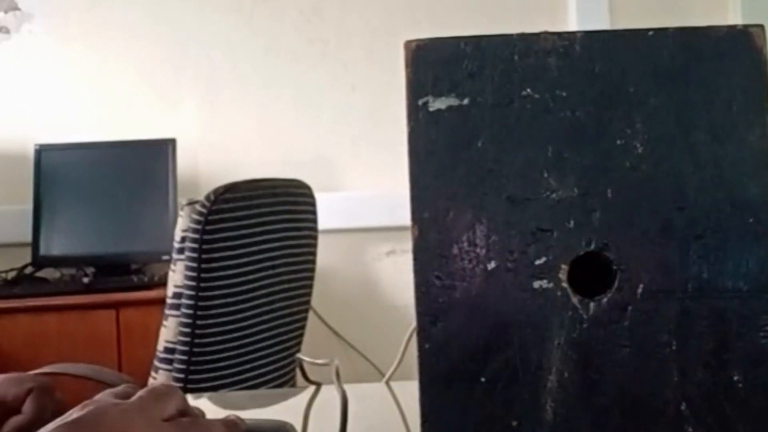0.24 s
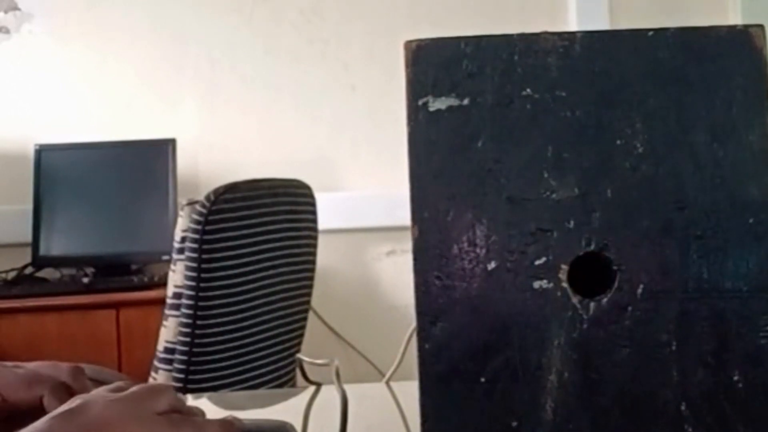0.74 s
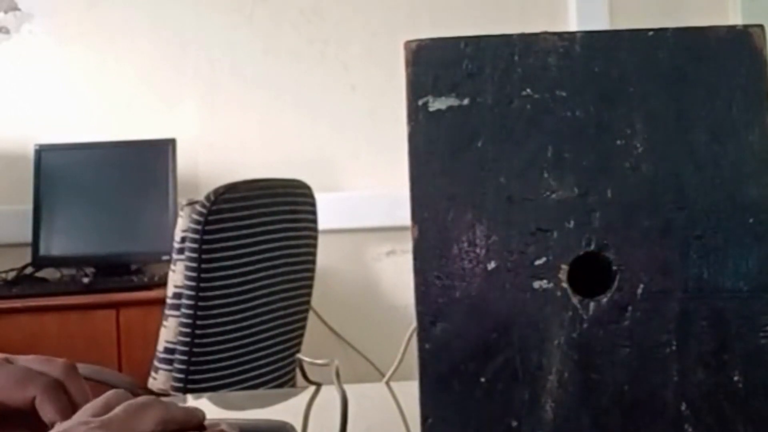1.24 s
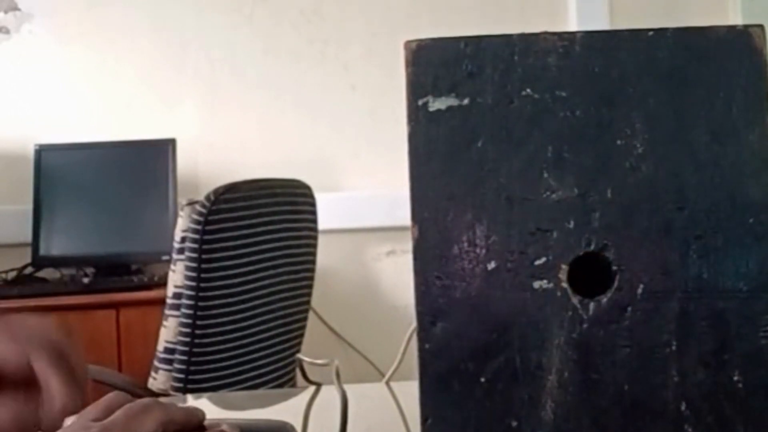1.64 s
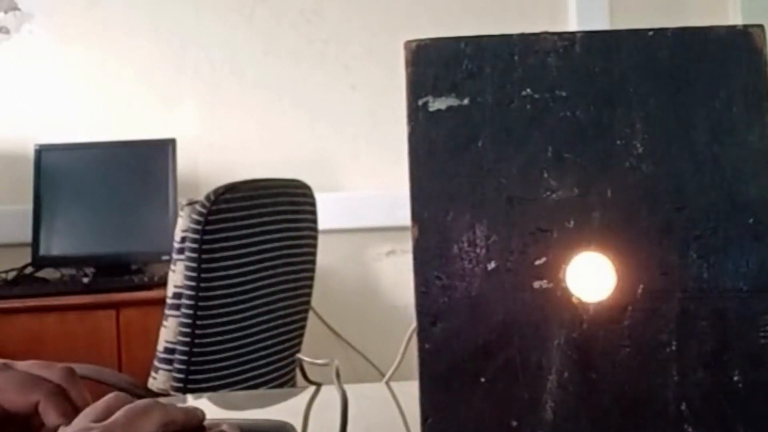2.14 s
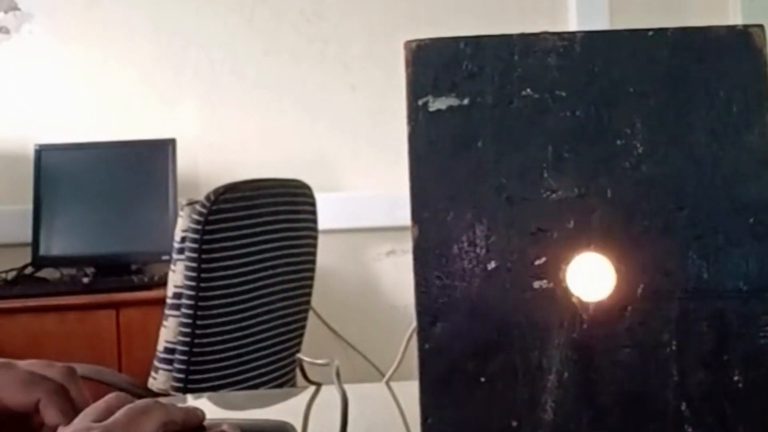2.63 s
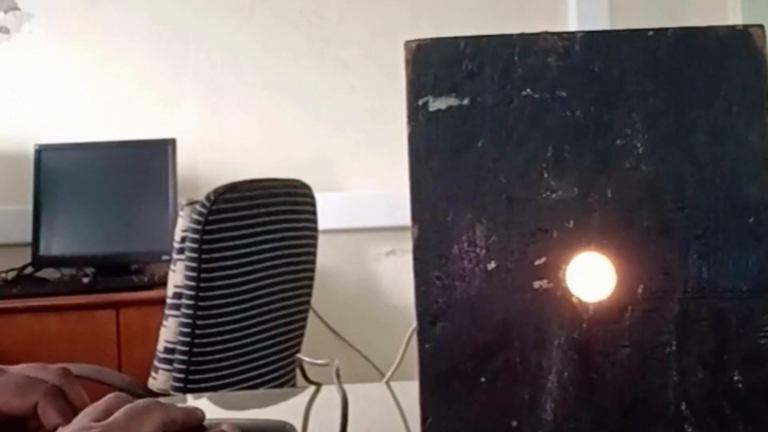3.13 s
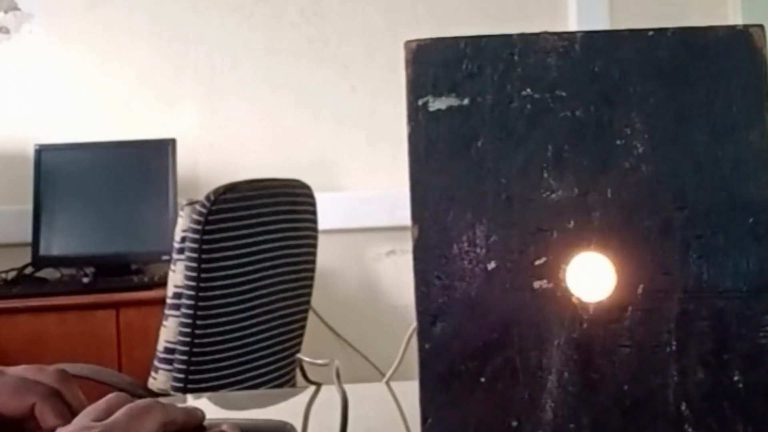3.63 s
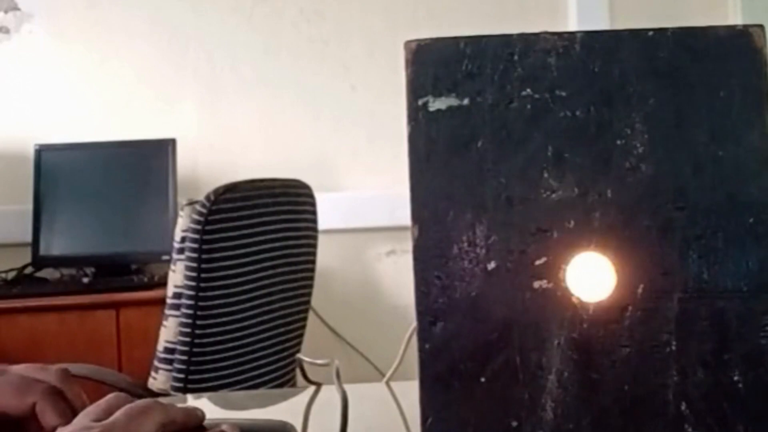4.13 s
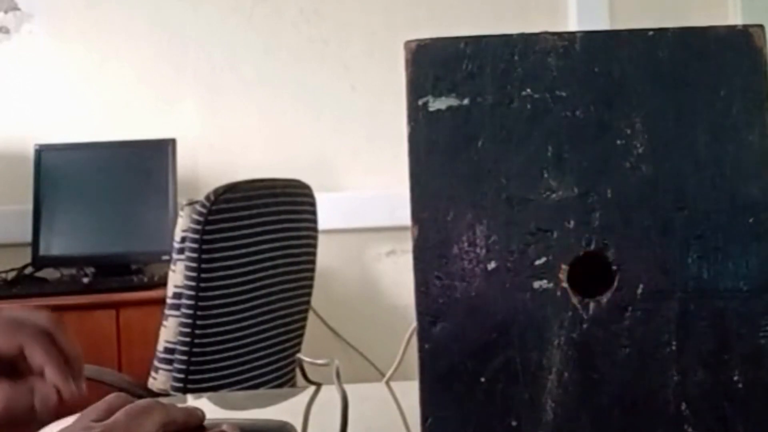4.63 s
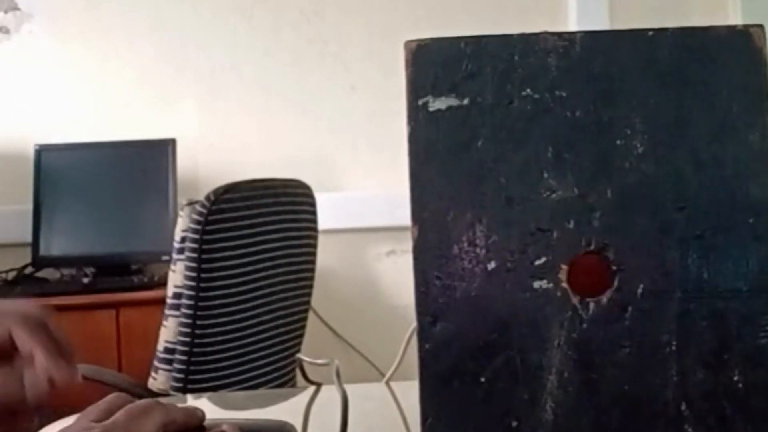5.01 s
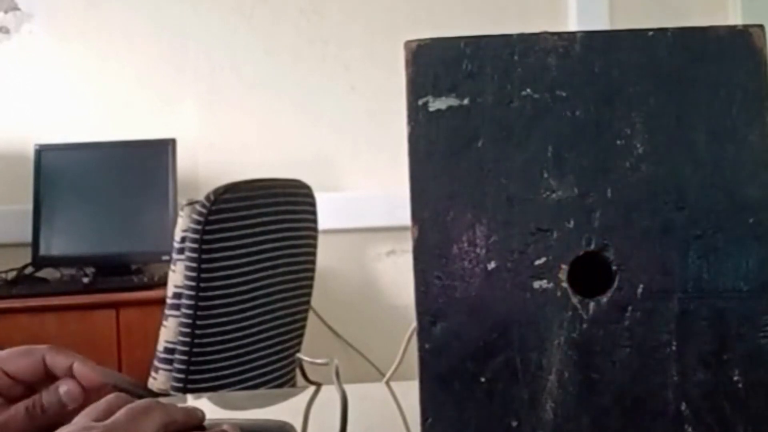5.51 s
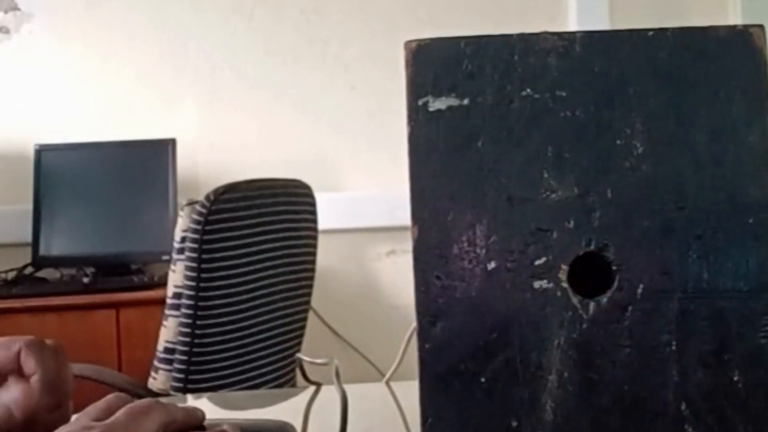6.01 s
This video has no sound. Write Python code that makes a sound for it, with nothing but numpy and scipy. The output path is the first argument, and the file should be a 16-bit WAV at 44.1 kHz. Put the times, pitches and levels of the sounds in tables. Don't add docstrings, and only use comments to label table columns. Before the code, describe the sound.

A small hard room, heard by a phone on a desk, with a signalling key close by and slightly left. Faint street noise and a thin hum lie underneath, while a draught makes soft, low, irregular bumps, separate on each side. A soft rub passes at 0.2 s and a brief brush at 1.2. At 1.7 the lever hisses and ticks sharply, its base knocking dully on the wood with a rapid little bounce and a short boxy echo. A heavier clack follows at 2.6, a light, ringing one at 3.5, then two strong ones at 4.45 and 4.9, each trailed by a small dry snap, the second clearer. Faint bird whistles, blurred and falling, come from far outside around 2 and from 5 to 5.7. After the last stroke only draught thumps, strongest near 6.0, and quiet air remain until 6.3.

```python
import sys
import numpy as np
from scipy import signal
from scipy.fft import rfft, irfft, next_fast_len
from scipy.io import wavfile
from scipy.ndimage import uniform_filter1d

SR = 44100
rng = np.random.default_rng(int(sys.argv[2]) if len(sys.argv) > 2 else 0)


def ratio(d):
    e = np.asarray(d, float) / 20
    return 10 ** e


def file_out(sig):
    cols = np.atleast_2d(sig).T
    lim = np.clip(cols, -1, 1)
    pcm = np.round(lim * 32767).astype(np.int16)
    wavfile.write(sys.argv[1], SR, pcm)


N = 276066

# start [s], peak [dB], scrape before it [dB], hiss swelling into it [dB], room [dB].
TICKS = [
    (1.7107, -23, -5, -11.5, 5),
    (2.6253, -20.5, -8, -25, 1),
    (3.484, -23, -9.5, -50, -4.5),
    (4.4547, -18.5, -11, -20.5, -1.5),
    (4.8719, -18, -10, -16, 2),
]
# start [s], peak [dB], desk ring [dB], room [dB].
THUDS = [
    (1.7204, -17, -6.5, -1.5),
    (2.6363, -13.5, -7, -2.5),
    (3.491, -28, 1, -5),
    (4.4658, -14, -7, -0.5),
    (4.8835, -14, -5.5, -3),
]
# start [s], peak [dB].
REBOUNDS = [
    (4.5433, -44),
    (4.947, -32.5),
]
# frequency [Hz], density [dB per Hz].
AIR = [(120, -22), (200, -10), (334, -15), (500, -16), (900, -24), (1900, -24.5), (3000, -33), (4400, -40),
       (5400, -36.5), (7700, -43), (8200, -54), (11000, -51.5), (14000, -46), (15000, -41.5),
       (15900, -50.5)]


def band(x, hz, width):
    return signal.lfilter(*signal.iirpeak(min(hz, .45 * SR), hz / width, fs=SR), x)


def steep(x, hz, width):
    return band(band(x, hz, width), hz, width)


def unit(x):
    return x / np.max(np.abs(x))


def fade(t, t60):
    return np.exp(-np.log(1000) * t / t60)


def smooth(x, size):
    return uniform_filter1d(uniform_filter1d(x, size), size)


def add(out, x, s):
    i = int(s * SR)
    n = min(x.shape[-1], out.shape[-1] - i)
    out[..., i:i + n] += x[..., :n]


def walk(rate):
    hold = int(SR / rate)
    steps = np.repeat(rng.standard_normal(N // hold + 1), hold)
    return 1.3 * smooth(steps, hold)[:N]


def at(table, hz):
    return np.interp(np.log(hz), np.log(np.array(table)[:, 0]), np.array(table)[:, 1])


def blend(mid, side, like):
    return np.sqrt(1 + like) * mid + np.sqrt(1 - like) * side * np.array([1, -1]).reshape(2, *[1] * mid.ndim)


def pair(length, hz, width, like):
    mid, side = steep(rng.standard_normal((2, length)), hz, width)
    return blend(mid, side, np.clip(like, 0, 1))


def air():
    # frequency [Hz], level [dB rms].
    hum_lines = [(269, -87), (333.5, -77), (572, -92)]
    # frequency [Hz], left-right likeness [0-1].
    alike = [(60, .2), (130, 0.3), (290, 1), (640, 0.25), (1400, 0.), (6800, 0.4), (15000, 0.8)]
    # time [s], level [dB].
    street = [(0, -68.5), (0.328, -73), (0.899, -68), (1.44, -72.5), (1.692, -65), (2.039, -72),
              (2.498, -70.5), (3.679, -73), (4.2, -68.5), (4.831, -73), (5.199, -73), (6.26, -69)]
    treble_swell = 0.45

    t = np.arange(N) / SR
    hz, when, (mid, side) = signal.stft(rng.standard_normal((2, N)), SR, nperseg=1024)
    hz = np.maximum(hz, 20)[:, None]
    s, db = np.transpose(street)
    treble = np.clip(np.log2(hz / 600) / 3, 0, 1)
    swell_db = np.interp(when, s, db - db.mean()) * (1 - (1 - treble_swell) * treble)
    patch = rng.standard_normal(mid.shape)
    patch = uniform_filter1d(uniform_filter1d(patch, size=4, axis=0), size=5, axis=1)
    both = blend(mid, side, np.clip(at(alike, hz), 0, 1))
    level_db = at(AIR, hz) + swell_db + 3.0 * patch / patch.std()
    out = signal.istft(both * ratio(level_db), SR, nperseg=1024)[1][:, :N]
    hum = np.zeros(N)
    for hum_hz, db in hum_lines:
        hum += ratio(db + 2.0 + walk(18)) * np.sin(2 * np.pi * hum_hz * t + 0.86 * walk(18))
    return out / out.std() * ratio(-69.5 + np.array([[1.1], [-1.1]])) + hum


def small_eddies(gusts):
    gap_s, eddy_hz, cycles, scatter_db = 0.031, 92, 1.7, 3
    chance = rng.standard_normal((400, 3))
    s = gap_s * (np.arange(len(chance)) + .25 * chance[:, 0]) + .04
    strength = sum(ratio(db) * np.exp(-.5 * ((s - middle) / (length / 2)) ** 4) for middle, length, db in gusts)
    db = 20 * np.log10(strength + 1e-6) + scatter_db * chance[:, 1]
    rows = np.transpose([s, db, eddy_hz * (1 + 0.22 * chance[:, 2]), np.full(len(s), cycles)])
    return list(rows[s < N / SR])


def draught(puffs, gusts, rumble_db):
    out, t = np.zeros(N), np.arange(-1600, 1600) / SR
    strong_cycles = 1.094
    eddies = [(s, db, hz, strong_cycles) for s, db, hz in puffs] + small_eddies(gusts)
    for (s, db, hz, cycles), turn in zip(eddies, rng.random(500)):
        puff = np.exp(-.5 * (2.54 * t * hz / cycles) ** 2) * np.cos(2 * np.pi * (hz * t + turn))
        add(out, ratio(db) * puff, max(s + t[0], 0))
    gust = np.sqrt(np.abs(smooth(out ** 2, 2500)))
    rumble = steep(rng.standard_normal(N), 60, 120)
    rumble_level = (ratio(rumble_db) + ratio(-10.5) * gust) * ratio(5.3 * walk(25))
    out = out + rumble_level * rumble / rumble.std()
    return signal.sosfiltfilt(signal.butter(3, [44., 300.], "band", fs=SR, output="sos"), out)


def rustles():
    # start [s], peak [dB], rise [s], t60 [s].
    rubs = [
        (.161, -52, 0.018, 0.41),
        (1.203, -52.5, 0.0004, .2),
        (3.238, -66, 0.024, 0.27),
        (5.564, -73.5, 0.028, .15),
        (5.899, -84, 0.02, 0.29),
        (4.427, -55, 0.0082, .12),
    ]
    # frequency [Hz], width [Hz], level [dB].
    rubbed = [
        [(2510, 530, -0.5), (4820, 1670, -8.5), (13900, 2000, -24), (960, 1600, -7.5)],
        [(6580, 1320, 3.5), (14040, 3600, -7), (2200, 660, -13.5)],
        [(5380, 1400, -1), (7160, 560, -2), (1850, 350, -1.5), (11700, 2600, -8.5)],
        [(14460, 1870, 5)],
        [(12850, 3600, 0.5)],
        [(6510, 1500, 1.5), (2050, 400, -1.5), (10940, 3700, -1)],
    ]

    out, t = np.zeros((2, N)), np.arange(int(.25 * SR)) / SR
    for (s, db, rise, t60), colours in zip(rubs, rubbed):
        grain = ratio(2.5 * np.repeat(rng.standard_normal(len(t) // 150 + 1), 150)[:len(t)])
        shape = np.minimum(t / rise, 1) * fade(np.maximum(t - rise, 0), t60)
        shape = shape / (1 + np.exp((t - .085) / 0.019))
        for hz, width, g_db in colours:
            noise = grain * rng.standard_normal((2, len(t)))
            noise = steep(steep(noise, hz, 2.7 * width), hz, 2.7 * width)
            add(out, ratio(db + g_db) * shape * noise / noise.std(), s)
    return out


def ticks():
    # frequency [Hz], width [Hz], level [dB].
    contact = [(1430, 1800, -12.5), (2130, 810, -6), (4900, 4400, -2.5), (7270, 1100, -5.5),
               (9500, 1800, -11), (12120, 1100, -1), (14600, 1800, -15.5)]
    lead_s = .019

    out, t = np.zeros(N), np.arange(2600) / SR - lead_s
    for s, db, scrape_db, hiss_db, _ in TICKS:
        noise = rng.standard_normal((3, len(t)))
        chatter = noise[0] * (t > 0) * (np.exp(-(t / 0.0011) ** 4) + 0.13 * np.exp(-t / 0.0021))
        tick = sum(ratio(g_db) * unit(steep(chatter, hz, width)) for hz, width, g_db in contact)

        rub = np.where(t < 0, np.clip(1 + t / 0.0076, 0, 1), np.exp(-t / 0.0047)) * noise[1]
        scrape = band(rub, 1900, 470) + ratio(-17.5) * steep(rub, 5200, 8400)

        approach = np.exp(t / 0.034) * np.minimum((t + lead_s) / 0.0055, 1)
        hiss = np.where(t < 0, approach, np.exp(-t / 0.0044)) * steep(noise[2], 6000, 22000)

        stroke = unit(tick) + ratio(scrape_db) * unit(scrape) + ratio(hiss_db) * unit(hiss)
        add(out, ratio(db) * stroke, s - lead_s + 0.00041)
    return out


def arm():
    # frequency [Hz], level [dB], t60 [s].
    arm_lines = [(7400, 0.5, 0.26), (9250, -8, .25), (10700, -6, 0.2), (12000, -4.5, .28), (14200, -9, .2)]
    arm_db = [-30, -29.5, -24.5, -27.5, -34]
    smear_hz = 1300

    out, t = np.zeros((2, N)), np.arange(int(.2 * SR)) / SR
    for (s, db, *_), ring_db in zip(TICKS, arm_db):
        for hz, g_db, t60 in arm_lines:
            line = pair(len(t), hz, smear_hz, 0.79)
            add(out, ratio(db + ring_db + g_db) * line / line.std() * fade(t, t60), s)
    return out


def room():
    # frequency [Hz], level [dB], t60 [s].
    answer = [(187, -5, 0.13), (301, -3.5, 0.3), (480, 4, 0.24), (730, 3.5, 0.21), (1204, -2, 0.23),
              (1610, -19.5, 0.12), (2039, -1.5, 0.23), (3440, -11.5, 0.22), (4860, -14, 0.27),
              (6570, -12.5, 0.3), (9500, -32, 0.1), (12200, -22, 0.34), (15000, -28, .3)]
    # frequency [Hz], left-right likeness [0-1].
    room_alike = [(150, 0.9), (290, 0.99), (640, 0.09), (1400, 0), (4000, 0.05), (8000, 0.4), (15000, 0.6)]

    out, t = np.zeros((2, N)), np.arange(int(.3 * SR)) / SR
    blows = [(s, db + room_db + 8.0, True) for s, db, *_, room_db in TICKS]
    blows += [(s, db + 11.0, True) for s, db in REBOUNDS]
    blows += [(s, db + room_db, False) for s, db, _, room_db in THUDS]
    for s, blow_db, sharp in blows:
        echo = np.zeros((2, len(t)))
        for hz, db, t60 in answer:
            width = hz * np.interp(hz, [300, 500, 4000, 9000], [0.3, 0.42, 0.37, 0.23])
            wash = pair(len(t), hz, width, at(room_alike, hz))
            echo += ratio(db) * wash * np.sqrt(1070000.0 / hz) * fade(t, t60)
        if sharp:
            echo = signal.lfilter(*signal.butter(1, 3000., "high", fs=SR), echo)
        add(out, ratio(blow_db) * echo * (1 - np.exp(-t / 0.0032)), s)
    flutter = ratio(2.8 * walk(250))
    return ratio(-34.5 + 1.52) * flutter * out


def thuds():
    # time after the first full touch [ms], level [dB], contact [ms].
    bounces = [
        [(-.9, -10, .2), (0, -1, .22), (1.6, 0, .3), (3.6, -4, .35), (7.6, -2, .6)],
        [(-.9, -13, .2), (0, 0, .22), (1.55, -1, .3), (3.5, -3, .3), (7.4, -3, .5)],
        [(-.9, -12, .2), (0, -3, .25), (1.5, 0, .25), (3.2, -5, .3), (7.4, -10, .5)],
        [(-.9, -11, .2), (0, 0, .22), (1.6, -1, .25), (3.5, -4, .3), (7.4, -4, .6)],
        [(-.9, -10, .2), (0, 0, .22), (1.55, -2, .3), (3.5, -1, .25), (6.7, -5, .45), (7.9, -5, .3),
         (16.2, -6, .4)],
    ]
    # frequency [Hz], width [Hz], level [dB].
    base = [(307, 860, -6.5), (471, 91, -5), (736.4, 1000, -7), (1352, 1800, 0.5), (2150, 700, -1.5)]
    # frequency [Hz], level [dB], t60 [s].
    desk_modes = [(290.2, 0.5, 0.38), (461, -2.5, 0.22), (507, -6, 0.34), (629, -2.5, 0.14),
                  (685, 1.5, 0.23), (809, -1, .18), (1047, -11.5, 0.18), (1250, -9.5, 0.1),
                  (1340, -7, 0.11), (1443, -10, 0.6), (1800, -8, .2), (2000, -13.5, 0.15),
                  (2270, -13, 0.25), (2400, -11, 0.12)]
    # frequency [Hz], level [dB], t60 [s].
    release_modes = [(291, -0.5, 0.28), (506, -3, 0.3), (560, -7, 0.28), (675, -2.5, 0.14), (805, -4, .14),
                     (1046, 0, 0.17), (1380, -11, .15), (1980, -10, .2), (2230, -4.5, 0.3), (2350, -7, .3)]
    lead_s = .003
    lift_db, lift_ms = -4, .4

    out, t = np.zeros(N), np.arange(int(.25 * SR)) / SR
    mode_sets = [desk_modes, desk_modes, release_modes, desk_modes, desk_modes]
    for (s, db, ring_db, _), touches, modes in zip(THUDS, bounces, mode_sets):
        ring = np.zeros(len(t))
        for hz, g_db, t60 in modes:
            spot_db = 1.2 * rng.standard_normal()
            ring += ratio(g_db + spot_db) * np.sin(2 * np.pi * hz * t) * fade(t, min(t60, .33))

        push = np.zeros(len(t))
        for ms, g_db, contact_ms in touches:
            late = 1000 * (t - lead_s) - ms
            touch = np.exp(-8 * (late / contact_ms) ** 2)
            dip = np.exp(-2 * ((late + lift_ms + contact_ms / 2) / contact_ms) ** 2)
            push += ratio(g_db) * (touch - ratio(lift_db) * dip)

        rattle = steep(rng.standard_normal(len(t)), 5500, 1900)
        rattle = unit(rattle * (t > lead_s - .001) * np.exp(-t / 0.0026))
        knock = unit(sum(ratio(g_db) * steep(push, hz, width) * np.sqrt(1000 / width) for hz, width, g_db in base))
        knock = unit(knock + ratio(5) * unit(push)) + ratio(-12.5) * rattle
        desk = unit(signal.fftconvolve(push, ring)[:len(t)])
        add(out, ratio(db) * (knock + ratio(ring_db - 7.0) * desk), s - lead_s)
    return out


def bird():
    # start [s], length [s], first pitch [Hz], last pitch [Hz], peak [dB].
    whistles = [(1.884, 0.21, 1937, 1900, -68), (1.989, 0.21, 2346, 1926, -61.5),
                (2.041, .14, 2206, 2050, -68.5), (2.402, 0.15, 1473, 1430, -74),
                (4.316, 0.21, 1860, 1930, -77), (5.041, 0.37, 2350, 2090, -63.5),
                (5.08, 0.094, 2020, 2060, -78.5), (5.16, 0.077, 2000, 1850, -72),
                (5.67, .09, 1900, 1900, -77.5), (5.418, 0.24, 2016, 1903, -65.5),
                (5.584, 0.18, 1490, 1480, -78.5), (5.43, 0.24, 2210, 2140, -77.5),
                (5.43, 0.12, 1500, 1470, -78.5), (6.04, 0.23, 2000, 1976, -74),
                (6.068, .09, 1462, 1430, -78), (6.206, 0.17, 1450, 1390, -73)]
    swell_share, swell_db = 0.3, 4
    rise_share, sag_power, tremble_hz = .07, 2.3, 75

    out, along = np.zeros((2, N)), np.arange(SR // 2) / SR
    for s, length, first_hz, last_hz, db in whistles:
        shake = rng.standard_normal((2, len(along))) + 1j * rng.standard_normal((2, len(along)))
        shake = signal.lfilter(*signal.butter(2, tremble_hz, fs=SR), shake)
        u = np.minimum(along / length, 1)
        climb = 1 - rise_share * np.maximum(1 - u / swell_share, 0) ** 2
        pitch = first_hz * climb + (last_hz - first_hz) * u ** sag_power
        tone = np.exp(2j * np.pi * np.cumsum(pitch) / SR)
        swell = ratio(db - swell_db * np.interp(u, [0, swell_share, 1], [1, 0, 1]) ** 2)
        swell = swell * np.sqrt(np.abs(np.sin(np.pi * u)))
        add(out, swell * np.real(tone * shake) * np.sqrt(2 / np.mean(np.abs(shake) ** 2)), s)
    return out


def rebounds():
    # frequency [Hz], width [Hz], level [dB].
    lever = [(1500, 1400, -4.5), (4700, 2100, -2.5), (14100, 3200, -6.5)]
    out, t = np.zeros(N), np.arange(600) / SR
    for s, db in REBOUNDS:
        snap = rng.standard_normal(len(t)) * np.exp(-t / 0.00151)
        metal = sum(ratio(g_db) * steep(snap, hz, width) for hz, width, g_db in lever)
        add(out, ratio(db) * unit(metal), s)
    return out


def gate(x):
    gate_db, soft_db = -55, 3
    hz, _, cells = signal.stft(x, SR, nperseg=512)
    power = np.mean(np.abs(cells) ** 2, axis=0)
    power = uniform_filter1d(uniform_filter1d(power, size=4, axis=0), size=3, axis=1)
    floor_db = np.maximum(at(AIR, np.maximum(hz, 20)), -43)[:, None]
    over = (10 * np.log10(np.abs(power) + 1e-16) - floor_db - gate_db) / soft_db
    return signal.istft(cells / (1 + np.exp(-over)), SR, nperseg=512)[1][:, :N]


def later(x, ms):
    return np.interp(np.arange(N) - ms * SR / 1000, np.arange(N), x)


def scene():
    # time [s], peak [dB], frequency [Hz].
    puffs_left = [(.374, -32, 120), (.714, -25.5, 95), (.764, -32, 121), (.792, -31.5, 99),
                  (.816, -24, 119), (.906, -32.5, 113), (1.001, -33, 98), (1.271, -45.5, 99),
                  (2.098, -27.5, 105), (2.609, -34, 135), (2.888, -28, 103), (2.943, -25.5, 110.6),
                  (3.923, -34.5, 119), (3.968, -26.5, 100), (4.015, -32.5, 96.3), (4.451, -30, 102),
                  (4.703, -35, 91.8), (4.759, -29, 118), (4.787, -22.5, 110.7), (4.809, -23, 114.3),
                  (4.86, -30.5, 120.2), (5.087, -29, 103.8), (5.33, -28.5, 117), (5.444, -34, 95.2),
                  (5.522, -36, 87), (5.725, -29.5, 105), (5.804, -28, 115), (5.936, -30.5, 111),
                  (5.99, -19.5, 106), (6.036, -32, 149.6), (6.147, -22.5, 148), (6.153, -33, 230)]
    puffs_right = [(.373, -45, 83), (.85, -36, 75), (1.316, -52, 69.5), (1.521, -33.5, 126),
                   (1.549, -32.5, 134), (1.582, -31.5, 95.5), (2.242, -53, 75), (2.267, -42, 74),
                   (2.372, -43, 68.5), (2.475, -28, 103), (2.617, -29.5, 105.3), (2.962, -48, 101),
                   (2.992, -42, 100.7), (3.041, -45.5, 88), (3.794, -44.5, 113), (4.137, -36.5, 92),
                   (4.168, -45.5, 111), (4.426, -30, 110), (4.453, -30, 108), (4.562, -32, 144),
                   (4.975, -37.5, 157), (5.064, -43, 79), (5.193, -43.5, 82.5), (5.34, -41.5, 82),
                   (5.65, -38.5, 102.4), (5.921, -48.5, 77), (5.944, -37, 106), (6.025, -31, 105.5),
                   (6.074, -48, 81)]
    # middle [s], length [s], peak [dB].
    gusts_left = [(0.029, 0.05, -57), (0.21, 0.032, -48), (0.366, 0.091, -39), (0.507, 0.12, -44),
                  (0.688, 0.038, -46), (0.881, 0.029, -31.5), (1.033, 0.047, -40), (1.138, 0.038, -50),
                  (1.281, 0.026, -46), (1.48, 0.11, -50), (1.752, 0.094, -42.5), (2.033, 0.075, -44.5),
                  (2.191, 0.09, -46), (2.52, 0.11, -54), (2.716, 0.12, -43), (2.968, 0.089, -48),
                  (3.5, 0.051, -50.5), (3.84, 0.097, -53), (4.165, 0.056, -47.5), (4.415, 0.033, -54),
                  (4.579, 0.17, -41), (4.977, 0.047, -37.5), (5.393, 0.11, -40), (5.887, 0.035, -39.5),
                  (6.091, 0.1, -42), (6.213, 0.068, -57)]
    gusts_right = [(.08, 0.059, -51), (.37, 0.09, -52), (.73, 0.057, -56), (.86, 0.022, -38.5),
                   (1.05, 0.054, -59), (1.18, 0.038, -61), (1.64, 0.055, -52), (1.75, 0.12, -55.5),
                   (2.09, .08, -52.5), (2.55, 0.058, -60), (2.68, 0.068, -45.5), (3.57, 0.13, -51.5),
                   (3.74, 0.14, -52), (4.35, 0.037, -46.5), (4.5, 0.094, -36), (4.918, 0.043, -36),
                   (5.1, 0.036, -57.5), (5.599, 0.056, -51), (6.019, 0.071, -49)]
    # frequency [Hz], level [dB].
    right_port = [(300, -3.5), (1000, -3.5), (2000, -2.5), (5000, -3), (7500, -9.5), (10000, 3),
                  (12200, -6), (15000, -8.5)]
    tick_lag_ms, desk_lag_ms = .1, .3
    echo_ms, echo_db = .5, -9.5

    key_band = signal.butter(2, [230, 15500.], "band", fs=SR, output="sos")
    tick, thud = signal.sosfilt(key_band, [ticks() + rebounds(), thuds()])
    left = ratio(5) * tick + ratio(4.0) * thud
    desk_right = later(thud, desk_lag_ms) + ratio(echo_db) * later(thud, desk_lag_ms + echo_ms)
    right = ratio(0.5) * later(tick, tick_lag_ms) + ratio(-2.0) * desk_right
    key = np.array([left, right]) + room() + arm()

    size = next_fast_len(N)
    shade = ratio(at(right_port, np.maximum(np.arange(size // 2 + 1) * SR / size, 20)))
    key[1] = irfft(rfft(key[1], size) * shade, size)[:N]

    wind = np.array([draught(puffs_left, gusts_left, -74.5), draught(puffs_right, gusts_right, -75)])
    return gate(key) + rustles() + bird() + wind + air()


def top_cut(x):
    return signal.sosfilt(signal.butter(12, 16640, fs=SR, output="sos"), x)


def record(dry):
    mix = signal.sosfilt(signal.ellip(8, .2, 70, 15900, fs=SR, output="sos"), dry)
    return top_cut(mix)


dry = scene()
out = record(dry)
file_out(out)
```